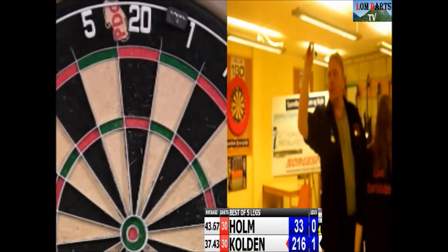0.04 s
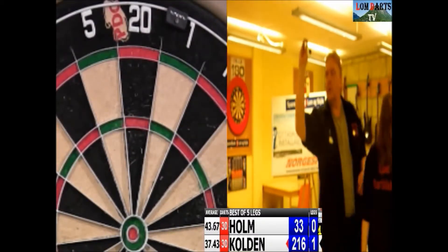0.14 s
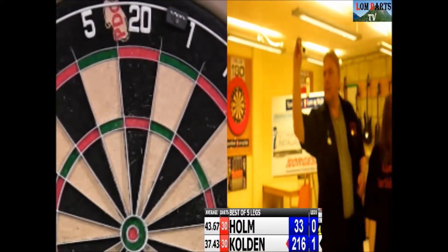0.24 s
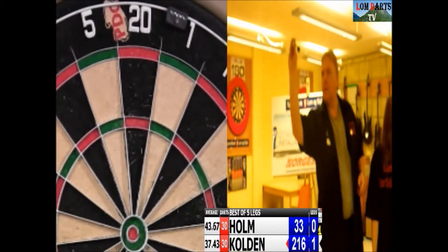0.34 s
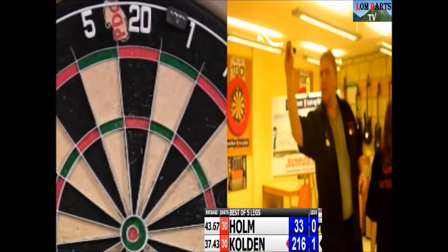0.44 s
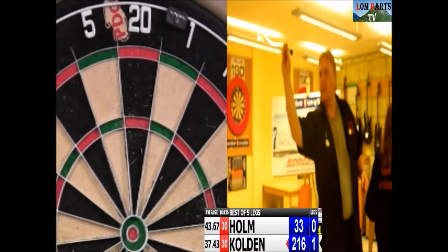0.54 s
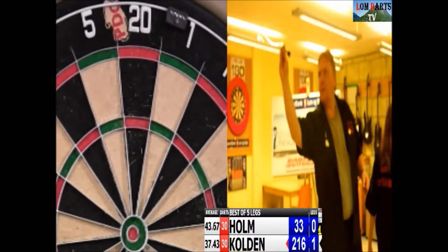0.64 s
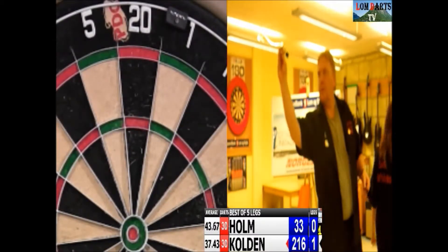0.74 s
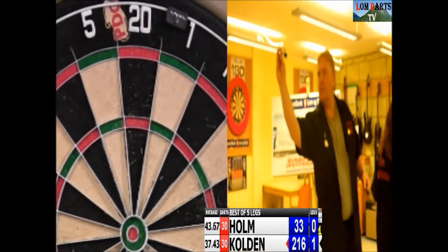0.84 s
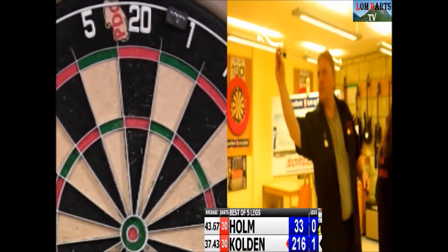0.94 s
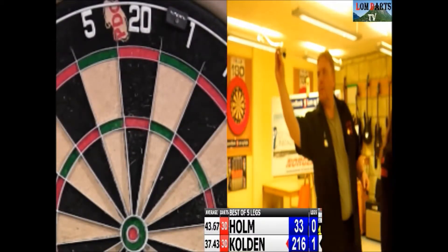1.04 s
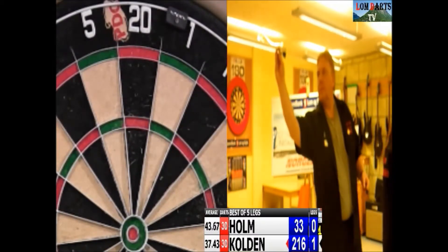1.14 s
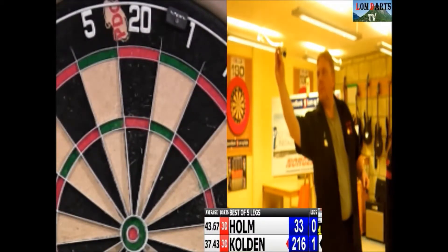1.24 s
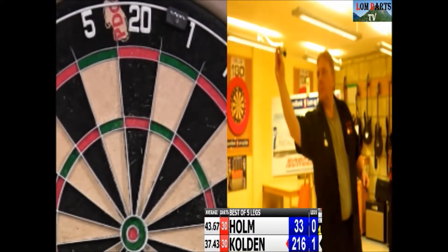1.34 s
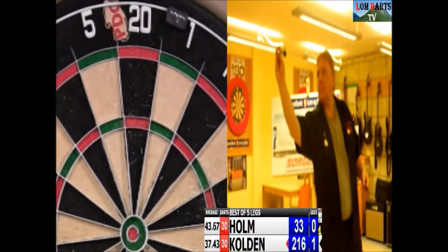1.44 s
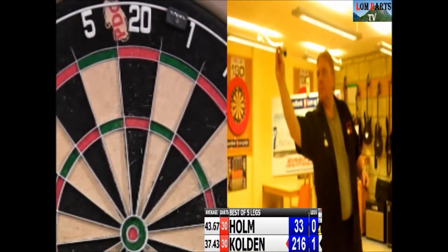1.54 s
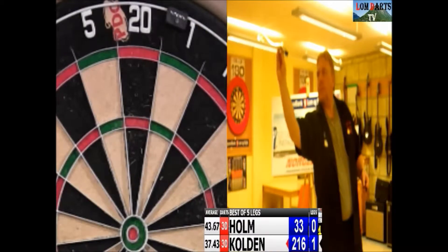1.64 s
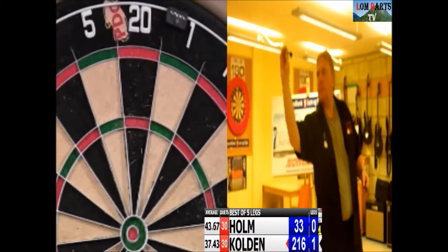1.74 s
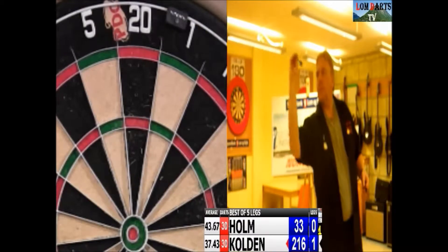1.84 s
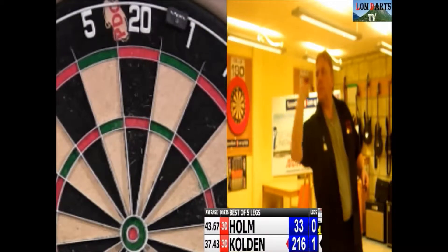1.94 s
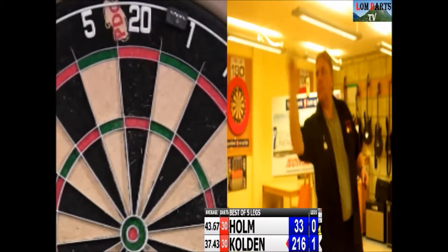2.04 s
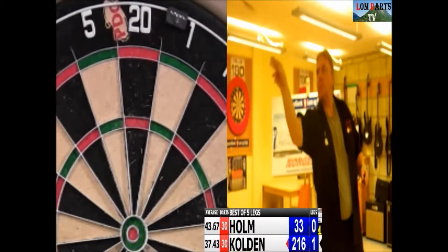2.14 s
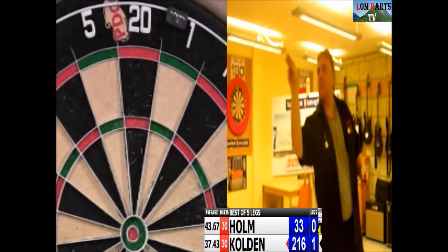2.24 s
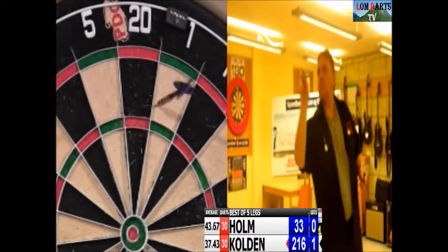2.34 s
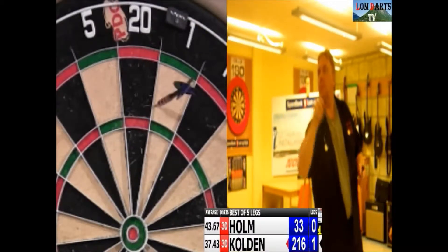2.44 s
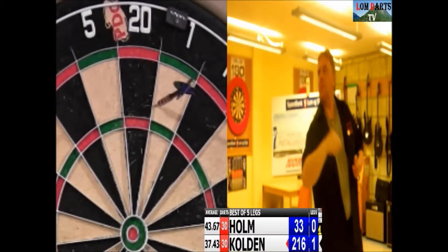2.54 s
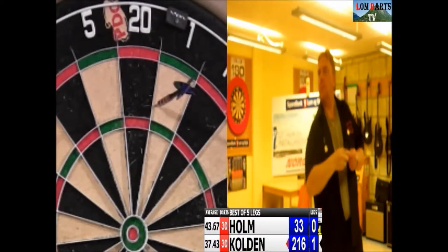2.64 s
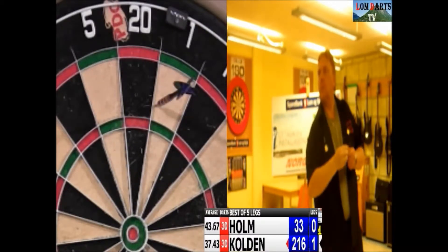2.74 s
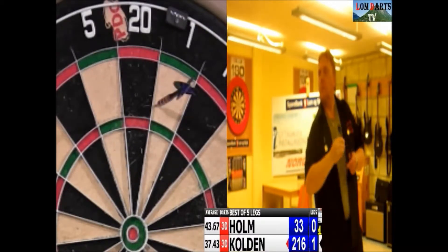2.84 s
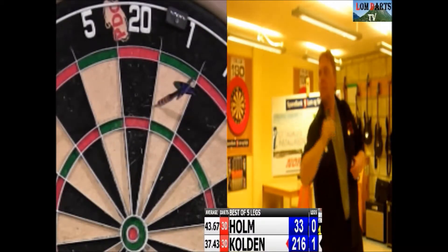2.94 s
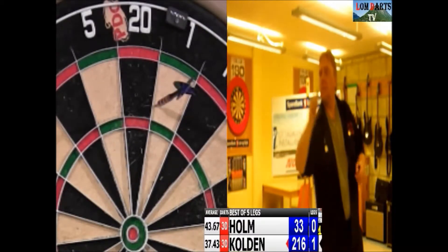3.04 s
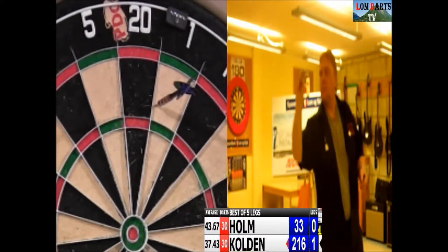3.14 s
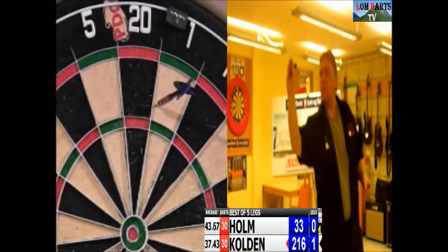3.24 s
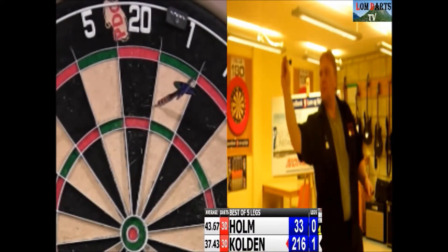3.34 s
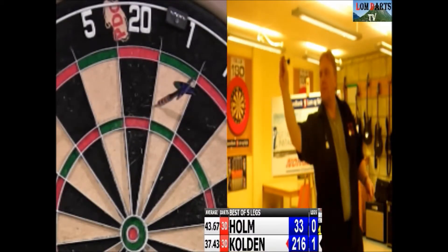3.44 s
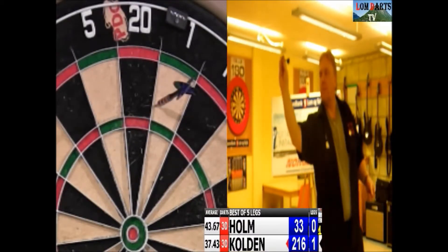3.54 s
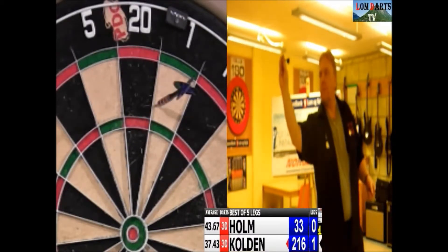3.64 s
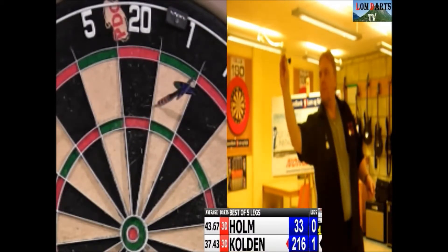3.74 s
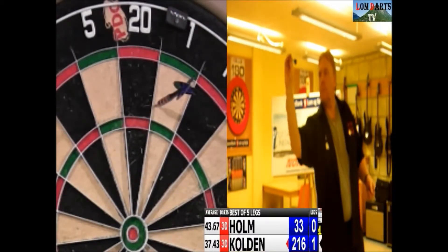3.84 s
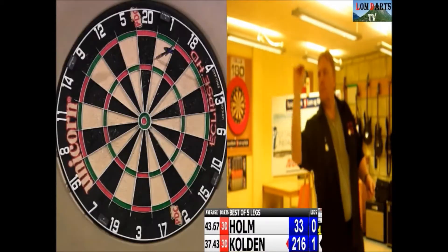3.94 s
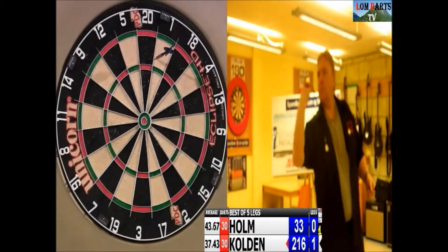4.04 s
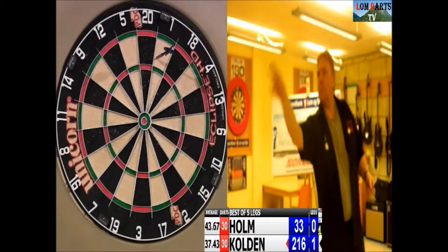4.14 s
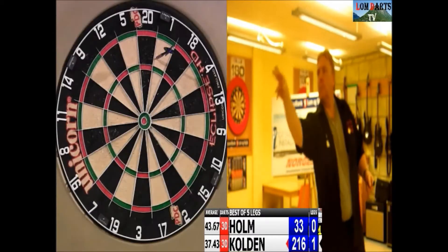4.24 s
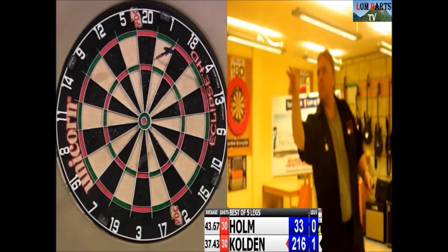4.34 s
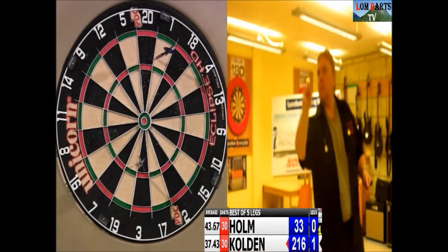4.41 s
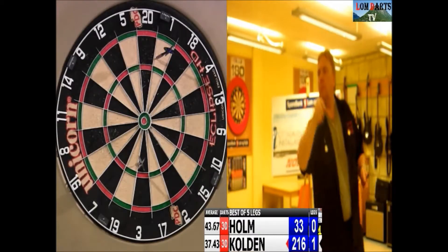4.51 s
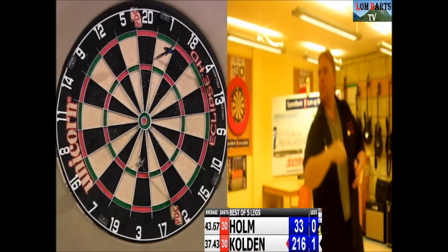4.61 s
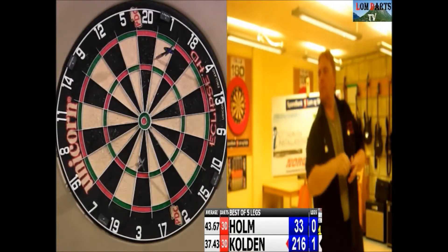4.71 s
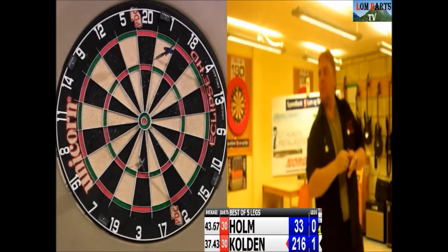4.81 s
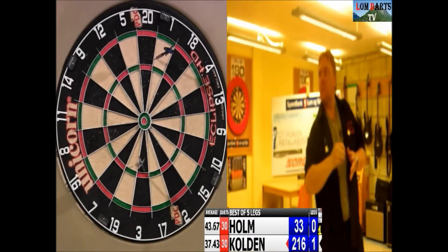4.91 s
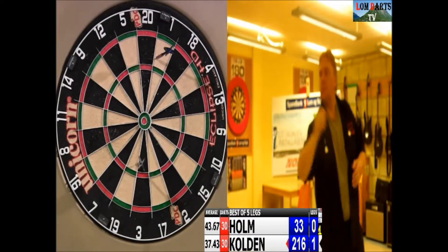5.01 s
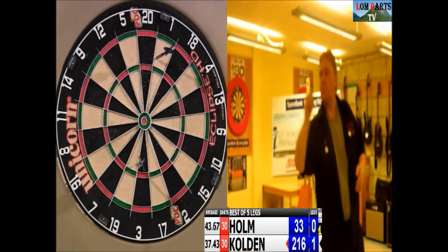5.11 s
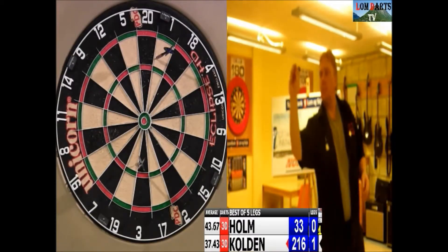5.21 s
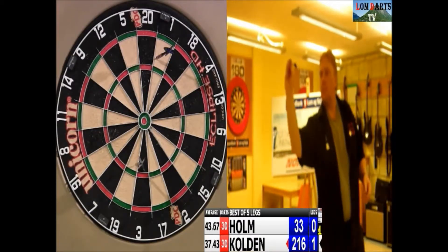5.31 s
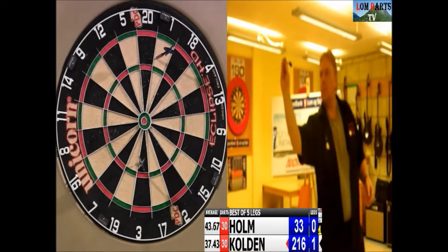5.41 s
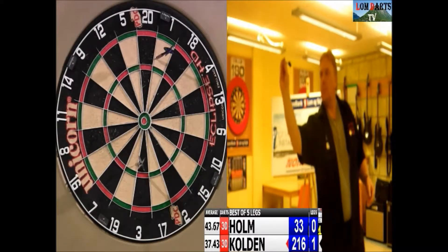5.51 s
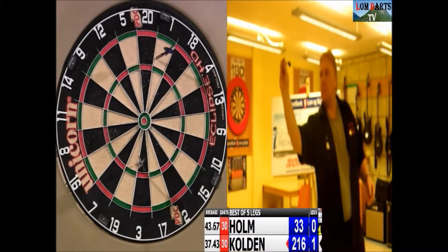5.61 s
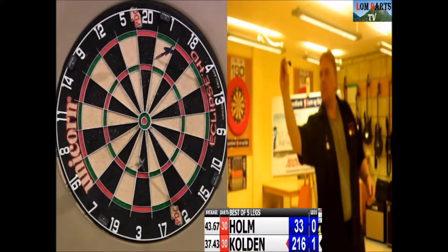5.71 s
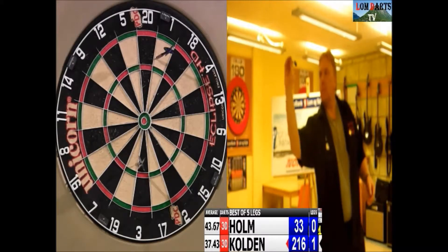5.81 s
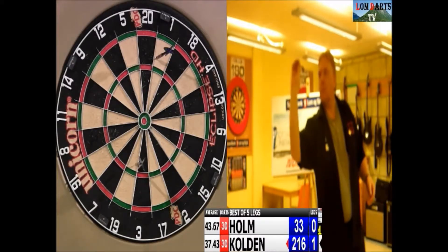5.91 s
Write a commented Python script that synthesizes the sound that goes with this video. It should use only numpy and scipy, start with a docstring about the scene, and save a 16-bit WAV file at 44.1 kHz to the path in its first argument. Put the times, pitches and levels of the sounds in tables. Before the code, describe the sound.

The sound opens in a small club room with quiet ventilation, a very faint electrical hum and a thin fan whine, all steady throughout. Clothes and shoes rustle softly, and a low floor rumble fades over the first two seconds. A faint footstep and a few small knocks and scuffs fall between 0.6 and 2.3 seconds. At about 2.5 seconds a dart strikes a bristle board with a sharp, close thud and a slight scratch, its metal barrel ticking just afterwards. Darts clink faintly in a hand from about 2.7 to 4.1 seconds, most clearly near 3.8. At about 4.5 seconds a second dart thuds in, similarly loud and slightly different in tone. Both hits stand far above everything else and leave a short room echo. Light rustling then dies down by six seconds.

```python
"""Two darts thud into a bristle board on the wall of a small club room: each tip scratches in, and the
barrel's jolts excite the board's damped modes. The first dart's barrel ticks after landing, then darts
clink in the hand. The room answers with early reflections and a short diffuse tail. Small knocks, clinks,
scuffs, a low footstep, rustling clothes and shoes and a floor rumble, all shaped noise, sound over
ventilation, mains hum and a fan whine."""
import sys
import numpy as np
from scipy import signal
from scipy.io import wavfile

SR = 44100
rng = np.random.default_rng(int(sys.argv[2]) if len(sys.argv) > 2 else 0)


def unload_audio(sound):
    """Save the sound as a 16-bit wav file, at the path given as the first command line argument."""
    columns = np.transpose(np.atleast_2d(sound))
    # keep every value between -1 and 1, then stretch to whole-number steps
    steps = np.round(np.clip(columns, -1, 1) * 32767)
    wavfile.write(sys.argv[1], SR, steps.astype(np.int16))


N = 263232


def darts():
    """Modal excitation: each jolt rings the board's modes, weighted by where the blow lands."""
    # jolts of the stopping darts: t/s, peak level/dB, spot (0 rim, 1 centre), scratch gain/dB re peak
    jolts = [(2.4735, -36, 0.3, -23.5), (2.4763, -14, 0.021, -35.5), (2.4788, -9.5, 0.085, -40.5),
             (2.4848, -16.5, 0.016, -33), (2.4924, -18.5, 0.048, -31), (4.5250, -39, 0.6, -25),
             (4.5285, -12.5, 0.93, -36.5), (4.5314, -11, 0.55, -44.5), (4.5340, -12.5, 1, -45.5)]
    # modes of the board on its wall: f/Hz, level hit at rim/dB, level hit at centre/dB, T60/s
    board_modes = [(79.5, 3, -5.5, 0.062), (213.7, -37.5, -38.5, 0.14), (290, -21.5, -12.5, 0.0688),
                   (327, -5.5, -41, 0.058), (396, 7, -43, 0.035), (362, -24, -42, .7), (381, -23, -42, .9),
                   (464, -9.5, -11.5, 0.056), (595, -9, 9, 0.053), (555, 3.5, 12, 0.047),
                   (603, 3.5, -13, 0.043), (740, -9, 1.5, 0.038), (932, -3, 1.5, 0.022),
                   (957, -16, 15, 0.0069), (1210, -14, 4.5, 0.018), (1340, -30, -31, 0.022),
                   (1756, -5.5, -10, 0.014), (2070, -26.5, -6, .02), (2290, -18.5, -7.5, 0.0079),
                   (2687, -19, -5.5, 0.0079), (3390, -5, -20.5, 0.019)]
    t = np.arange(SR) / SR
    cushion = signal.butter(4, 2400, fs=SR, output="sos")   # the fibres soften the blow
    low_cut = signal.butter(3, 230, "high", fs=SR, output="sos")
    scratch_band = signal.butter(1, [2500, 13000], "band", fs=SR, output="sos")
    blow = -signal.sosfilt(low_cut, signal.sosfilt(cushion, signal.unit_impulse(SR)))
    modes = np.array([ring(blow, hz, t60) for hz, _, _, t60 in board_modes])
    rim_db, centre_db = np.array(board_modes)[:, 1:3].T
    out = 0
    for s, peak_db, spot, scratch_db in jolts:
        thud = from_db(rim_db + spot * (centre_db - rim_db)) @ modes
        scratch = signal.sosfilt(scratch_band, rng.standard_normal(SR))
        scratch *= from_db(scratch_db - 60 * t / 0.18)
        # the tip scratches 4 ms ahead of the jolt
        out += from_db(peak_db) * (place(s, unit_peak(thud)) + place(s - .004, scratch))
    return out


def metal_ticks():
    """Free vibration: each touch is a brief rasp that rings the metal modes of a dart."""
    # the first dart's barrel ticks after landing, then darts clink in the hand:
    # t/s, relative peak level/dB, spectral tilt/(dB per octave)
    touches = [(2.4940, -38, -4), (2.5000, -46, 12), (2.5090, -44, 4), (2.5135, -49, 8), (2.5308, -42, -10),
               (2.5455, -50, 6), (2.7443, -57, 10), (2.7900, -59, 5)]
    # modes of the metal: f/Hz, relative level/dB, T60/s
    metal_modes = [(5340, 1, .003), (7330, 2.5, 0.0076), (8820, -7, 0.003), (9600, -1.5, 0.0061),
                   (11500, -31, .005), (12800, -7, 0.0088)]
    out, t = 0, np.arange(SR // 20) / SR
    for s, peak_db, tilt_db in touches:
        rasp = np.diff(rng.standard_normal(len(t)) * from_db(-60 * t / 0.0093))
        tick = sum(from_db(db + tilt_db * np.log2(hz / 9000)) * ring(rasp, hz, t60)
                   for hz, db, t60 in metal_modes)
        out += from_db(peak_db) * place(s, unit_peak(tick))
    return out


def small_impacts():
    """Resonant filtering: each impact is a burst of decaying noise in one broad resonance."""
    # small knocks, clinks, scuffs and a low footstep: t/s, peak level ahead of the room/dB, f/Hz, T60/s
    impacts = [(0.621, -71, 65, .4), (0.777, -47, 900, 0.02), (1.148, -52, 580, 0.028),
               (1.286, -49, 523, 0.056), (1.709, -45, 800, .07), (2.235, -58, 300, .3),
               (2.33, -45.5, 2240, 0.053), (2.931, -60, 5050, .006), (3.271, -55, 4530, 0.0047),
               (3.793, -65, 1970, .04), (3.793, -55, 4170, .03), (3.843, -52, 5000, 0.1),
               (3.843, -50.5, 1700, 0.039), (3.85, -65, 9500, 0.06), (4.083, -52, 4500, .008),
               (5.839, -65, 1110, .04)]
    out, t = 0, np.arange(SR // 2) / SR
    for s, peak_db, hz, t60 in impacts:
        resonance = signal.butter(2, [hz / 1.3, hz * 1.3], "band", fs=SR, output="sos")
        burst = rng.standard_normal(len(t)) * from_db(-60 * t / t60)
        out += from_db(peak_db) * place(s, unit_peak(signal.sosfilt(resonance, burst)))
    return out


def room(source):
    """Convolution with an impulse response: direct sound, dull echoes, an exponentially decaying tail."""
    # reflections from walls, floor and ceiling: delay/s, level ahead of the low-pass/dB
    reflections = [(.0200, -13.5), (.0268, -14.5), (.0310, -10.5), (.0360, -24), (.0590, -13), (.0700, -22)]
    # spectrum of the diffuse tail: f/Hz, level/dB
    tail_spectrum = [(100, -32), (500, -33.5), (2000, -34), (6000, -33.5), (12000, -40.5)]
    # reverberation time: f/Hz, T60/s
    decay_times = [(80, 1), (210, 0.46), (560, 0.4), (1470, 0.35), (3880, 0.34), (10200, 0.32)]
    # left-right likeness of the tail: f/Hz, likeness (1 = identical)
    tail_likeness = [(60, 1), (250, 0.99), (600, .96), (1500, .92), (4600, 0.98), (13600, 0.55)]
    t, rise_s = np.arange(SR) / SR, .012
    tail = sum(noise * from_db(at_hz(tail_spectrum, hz) - 60 * t / at_hz(decay_times, hz))
               for hz, noise in noise_bands(SR, tail_likeness, width=0.97))
    echoes = np.zeros((2, SR))
    for k, (s, db) in enumerate(reflections):
        echoes[:, round(s * SR)] = from_db(db + np.array([-1.1, 1.1]) * (-1) ** k)   # sides alternate
    echoes = signal.sosfilt(signal.butter(1, 3000, fs=SR, output="sos"), echoes)
    response = signal.unit_impulse(SR) + echoes + tail * (1 - np.exp(-t / rise_s))
    return signal.fftconvolve(source[None], response, axes=1)[:, :N]


def movement_and_air():
    """Incoherent addition: flickering cloth, shoes and floor and steady ventilation sum in power."""
    # cloth rustle of people moving about: t/s, level/dB
    movement = [(0.0, -57), (0.12, -54.5), (0.23, -60), (0.68, -57.5), (1.01, -62.5), (1.16, -61),
                (1.22, -61.5), (1.55, -64.5), (1.86, -61), (2.18, -67.5), (2.24, -60), (2.45, -62),
                (2.9, -63), (3.0, -61.5), (3.55, -71), (3.75, -74), (3.8, -65), (3.87, -68.5), (3.96, -72),
                (4.08, -66), (4.19, -69), (4.3, -60), (4.46, -66.5), (4.9, -65), (4.98, -69), (5.2, -67.5),
                (5.74, -75.5), (5.84, -68.5), (5.97, -76.5)]
    # floor rumble dying away as someone walks off: t/s, level/dB
    floor_fade = [(0.0, -56), (0.07, -61), (0.2, -69), (0.6, -71), (0.98, -78), (1.15, -74), (1.4, -73),
                  (1.9, -84), (3.0, -85), (5.97, -92.5)]
    # spectra of cloth, shoes, floor and ventilation: f/Hz, relative density level/dB
    cloth_spectrum = [(120, -23.5), (250, -20), (500, -9.5), (1000, -2), (1800, -2.5), (3200, -7),
                      (5900, -14), (10000, -27.5), (13000, -41)]
    shoe_spectrum = [(100, -34), (200, -13.5), (300, -1.5), (500, -4.5), (900, -8), (1600, -26.5)]
    floor_spectrum = [(40, -30.5), (70, -24.5), (110, -2.5), (150, 4.5), (220, -13), (400, -35)]
    air_spectrum = [(30, -18.5), (70, -3), (160, 0.5), (440, 3), (1050, -2.5), (2260, -4), (5000, -9),
                    (9680, -15.5), (13500, -29)]
    # left-right likeness of the diffuse field: f/Hz, likeness (1 = identical)
    likeness = [(60, 0.93), (180, 0.66), (530, 0.49), (1560, 0.84), (4610, 0.69), (13600, 0.16)]
    cloth_db, floor_db, air_db = in_time(movement), in_time(floor_fade), -72
    swing_db = cloth_db + 64   # about the mean movement, -64 dB
    shoes_db = -69 + 0.88 * swing_db
    tilt_db_per_octave = 0.0962 * swing_db   # louder rustle is brighter
    out, common_flicker = 0, drift(rate_hz=30)
    for hz, noise in noise_bands(N, likeness, width=0.8):
        flicker_db = 0.69 * common_flicker + 1.05 * drift(rate_hz=20)
        brightness_db = tilt_db_per_octave * np.log2(hz / 2000)
        cloth = band_gain(cloth_spectrum, hz, cloth_db + brightness_db + flicker_db)
        shoes = band_gain(shoe_spectrum, hz, shoes_db + flicker_db)
        floor = band_gain(floor_spectrum, hz, floor_db + flicker_db)
        air = band_gain(air_spectrum, hz, air_db)
        out += noise * np.sqrt(cloth ** 2 + shoes ** 2 + floor ** 2 + air ** 2)
    return out


def hum():
    """Amplitude modulation: two pure tones waver slightly in level."""
    # mains hum and a faint fan whine: f/Hz, rms level/dB
    tones = [(50, -81), (934, -81)]
    t = np.arange(N) / SR
    return sum(np.sqrt(2) * from_db(db + 0.61 * drift(rate_hz=3)) * np.sin(2 * np.pi * hz * t)
               for hz, db in tones)


def ring(force, hz, t60):
    """Damped oscillator: a unit impulse starts a decaying sine."""
    r, w = from_db(-60 / (t60 * SR)), 2 * np.pi * hz / SR
    return signal.lfilter([0, np.sin(w)], [1, -2 * r * np.cos(w), r * r], force + 1e-18)


def noise_bands(size, likeness, width):
    """Partial coherence: mid and side noise mix in half-octave bands; yields (f/Hz, stereo noise)."""
    edges, white = 28 * 2 ** np.arange(0, 9.6, .5), rng.standard_normal((2, 2, size))
    for k, (low, high) in enumerate(zip(edges, edges[1:])):
        band = signal.butter(2, [low, high], "band", fs=SR, output="sos")
        mid, side = signal.sosfilt(band, white[k % 2])
        hz = np.sqrt(low * high)
        alike = at_hz(likeness, hz)
        yield hz, np.sqrt(1 + alike) * mid + width * np.sqrt(1 - alike) * side * [[1], [-1]]


def band_gain(spectrum, hz, level_db):
    """Power normalisation: the gain at hz of a spectrum scaled to a total level."""
    density = from_db(2 * at_hz(spectrum, np.arange(30, 14000.)))
    total_rms = np.sqrt(density.sum() / (SR / 2))
    return from_db(level_db + at_hz(spectrum, hz)) / total_rms


def drift(rate_hz):
    """Random fluctuation: low-passed noise of unit rms, drawn every 40 samples."""
    r = np.exp(-2 * np.pi * rate_hz * 40 / SR)
    slow = signal.lfilter([1], [1, -2 * r, r * r], rng.standard_normal(N // 40 + 2002))[2000:]
    slow /= np.sqrt(np.mean(slow ** 2))
    return np.interp(np.arange(N) / 40, np.arange(len(slow)), slow)


def from_db(db):
    """Level to amplitude ratio."""
    return 10 ** (np.asarray(db) / 20)


def unit_peak(x):
    """Normalisation to a peak of 1."""
    return x / np.abs(x).max()


def at_hz(points, hz):
    """Interpolation on a log-frequency axis."""
    freqs, values = np.transpose(points)
    return np.interp(np.log(hz), np.log(freqs), values)


def in_time(points):
    """Linear interpolation at every sample."""
    return np.interp(np.arange(N) / SR, *np.transpose(points))


def place(s, sound):
    """Delay by s seconds, within N samples."""
    return np.pad(sound, (round(s * SR), N))[:N]


def scene():
    """Superposition: blows pass through the room, ticks arrive mostly direct, the background is diffuse."""
    ticks = metal_ticks()
    direct_ticks = ticks + 0.68 * metal_ticks() * [[1], [-1]]   # a side signal makes the channels unlike
    blows = darts() + small_impacts() + from_db(-7) * ticks
    pan = from_db([[-0.15], [0.15]])
    return pan * room(blows) + direct_ticks + movement_and_air() + hum()


def record(dry):
    """Band limiting: a steep low-pass cuts the top; the left channel is a little weaker."""
    balance, stopband_hz = from_db([[-0.27], [0.27]]), 14400
    return signal.sosfilt(signal.cheby2(12, 70, stopband_hz, fs=SR, output="sos"), dry * balance)


dry = scene()
out = record(dry)
unload_audio(out)
```